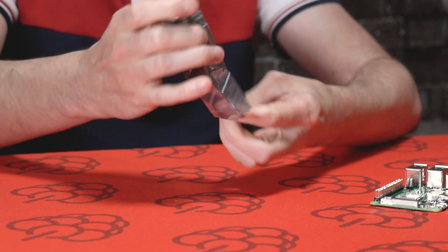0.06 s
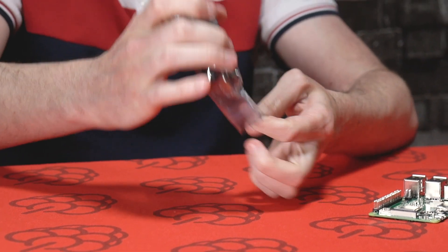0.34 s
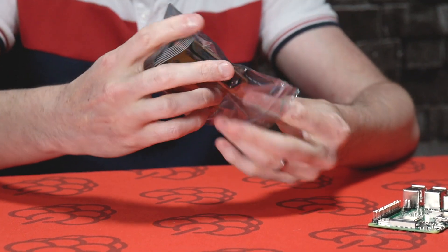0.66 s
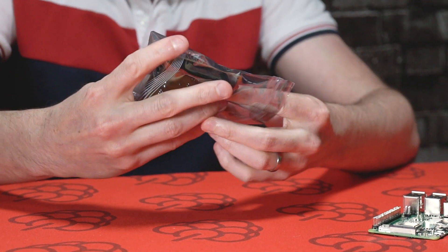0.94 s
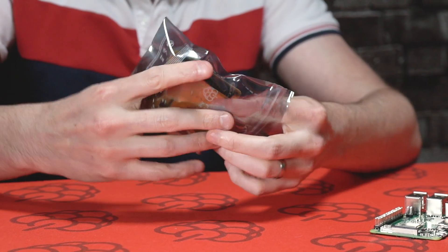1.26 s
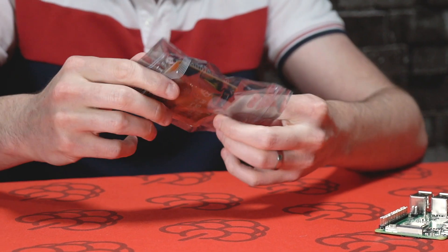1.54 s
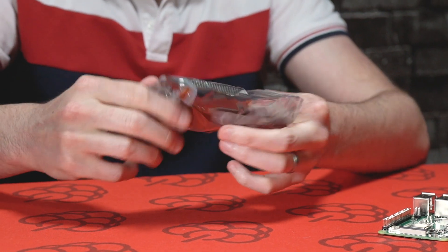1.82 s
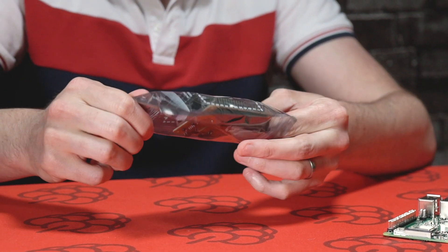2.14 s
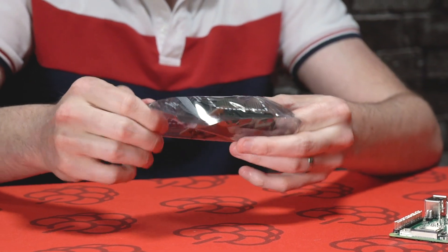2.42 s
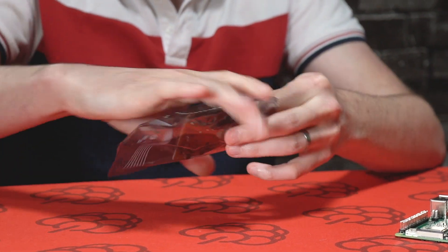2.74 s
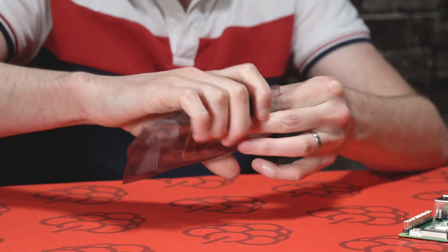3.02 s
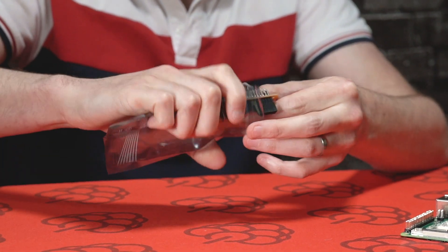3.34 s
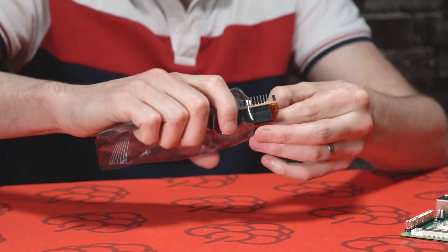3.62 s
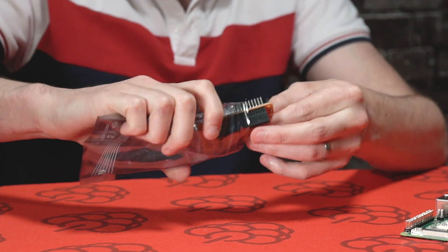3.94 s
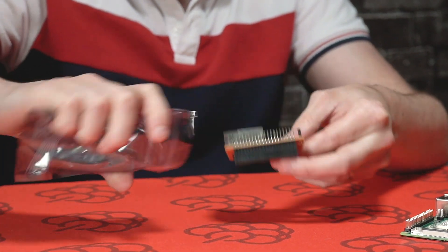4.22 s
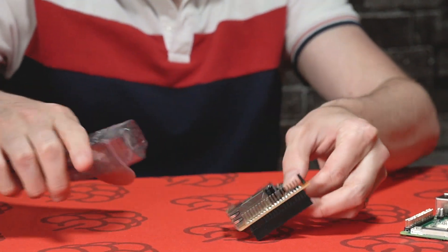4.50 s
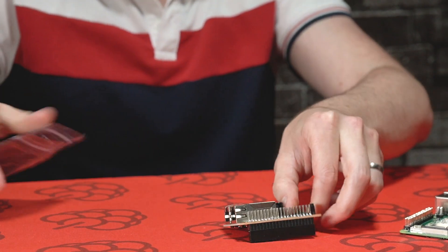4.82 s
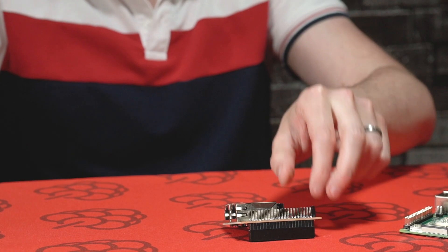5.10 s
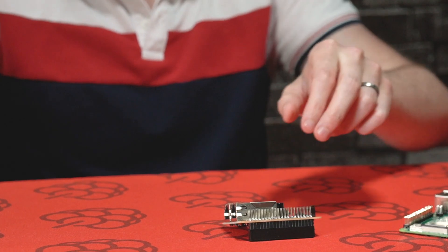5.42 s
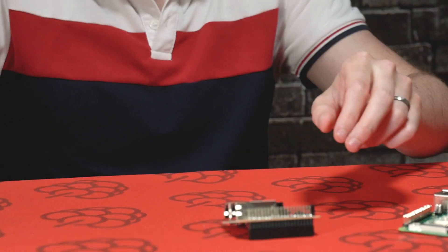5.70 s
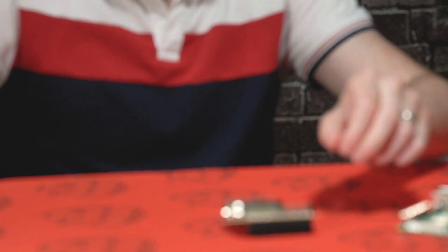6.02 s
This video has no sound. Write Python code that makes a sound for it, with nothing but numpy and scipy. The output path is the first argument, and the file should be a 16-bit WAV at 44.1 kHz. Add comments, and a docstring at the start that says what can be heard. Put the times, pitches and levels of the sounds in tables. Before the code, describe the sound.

A thin metallised plastic bag crackles close to the microphone as fingers work it, its creases snapping brightly and its panels flopping with little puffs of air. After a brief lull the seal opens with a soft hollow pop and more crinkling follows. A small circuit board is set down with dull knocks on a covered table, then the bag settles with faint brushes and a final double snap in the quiet little room.

```python
"""A stiff metallised plastic bag is turned over and opened by hand, close up in a small room.
Its creases buckle in sharp snaps over a fine rustle of wrinkles; whole panels flop with a puff of air,
some snaps leave a ringing tail, and the seal parts with a hollow pop. The circuit board from inside
knocks down on a covered table; the bag, laid aside, slides to rest and gives a last double snap."""
import sys
import numpy as np
from scipy import signal
from scipy.fft import rfft, irfft, next_fast_len
from scipy.io import wavfile

SR = 44100
rng = np.random.default_rng(int(sys.argv[2]) if len(sys.argv) > 2 else 0)


def master(y):
    """Save y as 16-bit WAV."""
    cut = np.clip(np.atleast_2d(y).T, -1, 1)
    pcm = np.round(cut * 32767)  # scale
    wavfile.write(sys.argv[1], SR, pcm.astype(np.int16))


N = 267241
TIME = np.arange(N) / SR
BRIEF = TIME[:768]  # time axis of one snap

# the big creases that buckle: (time [s], relative level [dB], facet ring [Hz], brightness [dB/octave])
CREASES = [(0.0661, -24.5, 980, -5.5), (0.0963, -25.0, 1220, -2.0), (0.1071, -29.5, 5500, 2),
           (0.1253, -22.5, 5800, -3.5), (0.215, -26, 3600, -3), (0.2615, -28, 2540, -2.5),
           (0.2662, -25.5, 1870, -1.0), (0.3033, -29.5, 2160, -2.5), (0.3574, -24.5, 1040, -1),
           (0.4202, -19.0, 1140, 0.5), (0.4414, -23, 2240, 2), (0.4741, -21.5, 3360, 2),
           (0.4844, -13.5, 2270, 0.5), (0.55, -23, 3100, 2.5), (0.5636, -21, 2440, -6),
           (0.567, -21.5, 3800, 4), (0.6269, -17, 2080, -2.5), (0.6595, -24.5, 2360, 0.5),
           (0.7016, -11, 7420, 3), (0.7154, -13.5, 2040, 0.5), (0.7385, -16.0, 5400, -0.5),
           (0.7674, -17.5, 7000, 0.5), (0.8315, -14.5, 7950, 0.5), (0.8564, -27.5, 3570, 9),
           (0.8763, -20.0, 3230, -1.5), (0.905, -23, 796, -0.5), (0.9311, -24.5, 5030, 0),
           (0.9591, -24.5, 1950, -4.0), (1.0145, -25.5, 1300, 1.0), (1.034, -29, 2100, -1),
           (1.0994, -16.5, 7000, -1), (1.106, -21.5, 2540, -2), (1.1221, -16, 1950, 2.5),
           (1.1339, -13.5, 6860, -1), (1.151, -21.5, 7000, 3), (1.173, -18.5, 2100, 0),
           (1.2271, -16, 8130, 3), (1.2507, -15.0, 5200, 3.5), (1.2559, -17.5, 2300, -2),
           (1.2981, -20, 1190, -3), (1.3342, -15, 6450, -2.5), (1.3468, -9.5, 5100, 0.0),
           (1.384, -20, 2270, 0), (1.408, -23, 804, -1), (1.4156, -18.0, 5100, 1.5),
           (1.4247, -11, 8010, 2.0), (1.4963, -19.5, 5300, 3.5), (1.5046, -14.5, 6200, 2.5),
           (1.5518, -21, 5440, 2.5), (1.5719, -25, 800, -0.5), (1.5845, -27, 3800, 0.5),
           (1.6326, -13, 7100, -2), (1.664, -23.5, 2230, -1.5), (1.675, -19, 6160, -0.5),
           (1.714, -21, 4540, -1.5), (1.7725, -23.5, 980, 0), (1.7874, -26, 6400, -4),
           (1.8007, -14.5, 2180, 0), (1.8343, -20, 5660, 6), (1.8499, -13, 6300, 1.5),
           (1.8816, -19, 6900, 2), (1.9045, -16, 2020, 1.5), (1.9186, -14, 7920, -3.5),
           (1.9233, -13, 5250, -2), (1.9447, -14, 7300, 2), (1.9733, -16, 7300, -1.5),
           (1.9833, -17.5, 1900, -0.5), (1.9907, -20, 1900, -4), (2.1129, -29.5, 2600, -6),
           (2.126, -16.5, 5150, 0.5), (2.2349, -21, 3180, 1.5), (2.369, -20.5, 920, 1.5),
           (2.4052, -20.5, 5700, 0.5), (2.474, -25.5, 2500, 3.0), (2.4828, -28, 6660, -0.5),
           (2.5296, -26.5, 2000, -1.5), (2.5515, -14, 6840, 1), (2.5858, -16.5, 2190, -3),
           (2.8182, -22, 1880, -1), (2.8492, -16.5, 5350, 1), (2.8593, -15.0, 2770, 0.5),
           (2.897, -21.5, 4160, 0), (2.9335, -24.5, 3500, 8), (2.973, -17.5, 5160, -0.5),
           (2.9923, -13, 6040, 6.5), (3.0415, -23.5, 6130, 0.5), (3.0737, -17.5, 1870, 4),
           (3.084, -16.5, 5400, -1), (3.1199, -10.5, 3280, 4.5), (3.1431, -19, 1800, -0.5),
           (3.2134, -27.5, 5840, 3.5), (3.353, -30, 7500, 0.5), (3.3714, -27, 7650, 16.5),
           (3.397, -21.5, 980, -3), (3.4634, -14, 5500, -1.5), (3.497, -19, 1740, -5.5),
           (3.5047, -20.0, 6260, -1.0), (3.565, -25, 1890, 0.5), (3.6268, -13.0, 1670, 1.5),
           (3.631, -15.0, 5900, 3.5), (3.6471, -19.0, 1780, -1), (3.7212, -16, 2500, 2.5),
           (3.7295, -14.5, 2530, 1.5), (3.7399, -15, 2920, 1), (3.9019, -29, 800, -5),
           (3.9206, -23.5, 1180, 2), (3.9501, -20.5, 6100, 5.5), (3.9812, -15.0, 6600, 2),
           (4.041, -16, 5260, 4.5), (4.1116, -9, 6700, -2.5), (4.2612, -29.5, 2550, 0),
           (4.3168, -23, 1000, -3), (4.3766, -30.5, 2000, -3), (4.408, -16.5, 6700, 3),
           (4.4193, -24, 2220, -4.5), (4.4244, -16, 2030, 1.0), (4.4566, -23, 885, -2.5),
           (4.6164, -15, 5100, -2.5), (4.7031, -16.5, 1840, 0.5), (4.909, -19, 6170, -1),
           (4.9242, -17.5, 4230, 2.0), (4.9549, -25, 7850, -3.5), (4.975, -27.5, 4200, 4),
           (4.9921, -22, 6300, 1.5), (4.995, -23, 3700, 1.0), (5.0092, -16.0, 6860, -0.5),
           (5.0327, -22, 790, -1), (5.0865, -28, 1970, 2), (5.177, -41.5, 1970, -2.5),
           (5.3331, -45, 2900, -3.0), (5.3794, -35.5, 2110, -3), (5.485, -45.5, 4600, -1),
           (5.5798, -29.5, 3484, 1.5), (5.6622, -26, 4200, -1), (5.6647, -26, 3900, -0.5)]


def undb(db):
    """Decibels to gain."""
    return 10 ** (np.asarray(db) / 20)


def add(out, s, sound):
    """Mix a sound in at time s."""
    i = int(np.clip(round(s * SR), 0, N - 1))
    out[i:i + len(sound)] += sound[:N - i]


def fade(t, t60):
    """Exponential decay by 60 dB in t60 seconds."""
    return np.exp(-np.log(1000) * t / t60)


def band(x, lo_hz, hi_hz, order=2):
    """Causal band-pass along the last axis."""
    edges_hz = [lo_hz, min(hi_hz, SR / 2 - 1)]
    return signal.sosfilt(signal.butter(order, edges_hz, "band", fs=SR, output="sos"), x)


def unit_rms(x):
    """Scale to rms 1."""
    return x / np.sqrt(np.mean(x ** 2))


def unit_click(x):
    """Scale each row to the energy of one millisecond at full level."""
    return x / np.sqrt(np.sum(x ** 2, axis=-1, keepdims=True) * 1000 / SR + 1e-18)


def still_air(level_db=-75):
    """Room tone: the still air is a faint, dark bed of noise."""
    # its spectrum: (frequency [Hz], relative density [dB])
    spectrum = [(15, -35), (25, -5), (80, 0), (405, -8), (1560, -18), (1790, -21), (3920, -20),
                (11300, -30), (16000, -49)]
    hz, db = np.transpose(spectrum)
    size = next_fast_len(N)
    f = np.linspace(1, SR / 2, size // 2 + 1)
    shape = undb(np.interp(np.log(f), np.log(hz), db))
    noise = rfft(rng.standard_normal(N), size)
    return undb(level_db) * unit_rms(irfft(noise * shape, size)[:N])


def opening_echo(db=-35, t60=0.38):
    """The room is still ringing from a crinkle a moment earlier."""
    return undb(db) * unit_rms(band(rng.standard_normal(N), 480, 6400)) * fade(TIME, t60)


def room_response(build_s=0.0098, early_db=-12, early_t60=0.032):
    """Table and body scatter the sound at once; the walls answer a little later and die away quickly."""
    # reverb tail off the walls: (frequency [Hz], relative level [dB], t60 [s])
    tail_bands = [(154, 6.5, 0.31), (412, 1.5, 0.25), (800, 2.5, 0.16), (1980, 1.5, 0.34), (4300, 0, 0.38),
                  (6900, -1.5, 0.36), (9700, -1, 0.31), (15000, 4.5, 0.2)]
    hz, db, t60 = np.transpose(tail_bands)
    t = TIME[:SR // 2]
    f = np.linspace(1, SR / 2, len(t) // 2 + 1)
    noise = rfft(rng.standard_normal(len(t)))
    tail = 0
    for share, gain, decay in zip(np.eye(len(hz)), undb(db), t60):
        part = irfft(noise * np.interp(np.log(f), np.log(hz), share), len(t))
        tail = tail + gain * part * fade(t, decay)
    tail = tail * (1 - np.exp(-(t / build_s) ** 2))
    early = rng.standard_normal(len(t)) * fade(t, early_t60) * (1 - np.exp(-(t / 0.0037) ** 2))
    return tail / np.linalg.norm(tail) + undb(early_db) * early / np.linalg.norm(early)


def effort(moves, grip_s=0.0099, settle_t60=0.38):
    """Envelope of a run of moves: each takes hold quickly, lasts its length, then the film settles."""
    power = np.zeros(N)
    for s, length, db in moves:
        attack = np.clip((TIME - s) / grip_s, 0, 1)
        release = fade(np.maximum(TIME - s - length, 0), settle_t60)
        power += (undb(db) * attack * release) ** 2
    return np.sqrt(power)


def wrinkles(count, lo_hz, hi_hz, cycles, spread_db):
    """Countless tiny wrinkles tick, each very briefly at its own pitch, most of them faint."""
    when, pitch, size, length = rng.random((count, 4)).T[:, :, None]
    t = BRIEF[:256]
    hz = lo_hz * (hi_hz / lo_hz) ** pitch
    age = t * hz / (cycles * (.5 + length))
    gain = undb(-spread_db * np.log(np.maximum(size, 1 / 20)))
    grains = gain * unit_click(age * np.exp(-age) * np.sin(2 * np.pi * hz * t))
    places = (when * N).astype(int) + np.arange(len(t))
    ticks = np.bincount(places.ravel(), grains.ravel(), N)[:N]
    return unit_rms(band(ticks, lo_hz, 1.48 * hi_hz, order=3))


def finger_rustle(handling):
    """Soft and crisp wrinkles tick as the fingers work the film."""
    soft = wrinkles(count=1100, lo_hz=587, hi_hz=2052, cycles=0.69, spread_db=3.5)
    crisp = wrinkles(count=1600, lo_hz=1740, hi_hz=6500, cycles=0.17, spread_db=4.5)
    return (undb(-1.5) * soft + undb(-2.0) * crisp) * handling


def bag_wobble(handling, relative_db=-14.5):
    """The held bag wobbles: a low rumble that follows the handling."""
    return undb(relative_db) * unit_rms(band(rng.standard_normal(N), 20, 58)) * handling


def small_creases(handling, count=80, above_handling_db=13, spread_db=4.0, lo_hz=750, hi_hz=2600):
    """Weaker, hollower creases give way at random while the fingers work; rows like those of CREASES."""
    when, pitch = rng.random((count, 2)).T
    size, tilt = rng.standard_normal((count, 2)).T
    s = (np.arange(count) + when) / count * TIME[-1]
    db = 20 * np.log10(np.interp(s, TIME, handling) + 1e-9) + above_handling_db + spread_db * size
    facet_hz = lo_hz * (hi_hz / lo_hz) ** pitch
    tilt_db = -3 + 3.0 * tilt
    return np.column_stack([s, db, facet_hz, tilt_db])


def burst(rise_s, flutter=0, flutter_s=1):
    """Snap envelope: a crease gives way in an instant; the film around it flutters a little longer."""
    age = BRIEF / rise_s
    return age * np.exp(1 - age) + flutter * np.exp(-BRIEF / flutter_s) * (1 - np.exp(-age))


def snaps(creases, rise_s, slowing, facet_db, facet_cycles, flutter=0, flutter_s=1):
    """Each snap is a burst of bending waves, slower in the lows, plus the ring of the flipped facet."""
    # bands of the bending waves: (low edge [Hz], high edge [Hz])
    wave_bands = [(470, 1400), (1400, 3500), (3500, 8000), (7500, 10000), (8500, 14000)]
    # tone of an average snap in those bands: (centre [Hz], relative level [dB])
    tone = [(810, -10), (2200, -7.5), (5300, -5), (8700, -14.5), (11000, -18)]
    pivot_hz, treble_hz = 4000, 8000
    facet_lift_db = 4  # the band that holds the facet's ring stands out
    soft_db, treble_loss = -15, 0.77  # softer creases lose top treble, in dB per dB
    s, db, facet_hz, tilt_db = creases.T[:, :, None]
    noise = rng.standard_normal((len(s), len(wave_bands), len(BRIEF)))
    facet_rise_s = facet_cycles / np.maximum(facet_hz, 1500)  # large, low facets ring longer
    facet = unit_click(np.sin(2 * np.pi * facet_hz * BRIEF) * burst(facet_rise_s))
    sounds = 0
    for k, ((lo, hi), (centre_hz, band_db)) in enumerate(zip(wave_bands, tone)):
        slow = (treble_hz / hi) ** slowing
        envelope = burst(rise_s * slow, flutter, flutter_s * slow)
        waves = unit_click(band(noise[:, k] * envelope, lo, hi, order=3))
        ringing = (lo <= facet_hz) & (facet_hz < hi)
        bright_db = tilt_db * np.log2(centre_hz / pivot_hz)
        dull_db = treble_loss * np.maximum(soft_db - db, 0) * (hi > treble_hz)
        gain = undb(band_db + bright_db + facet_lift_db * ringing - dull_db)
        sounds = sounds + gain * unit_click(waves + undb(facet_db) * facet * ringing)
    out = np.zeros(N)
    for start, sound in zip(s[:, 0], undb(db) * unit_click(sounds)):
        add(out, start, sound)
    return out


def bag_sway(typical_hz=36, t60=0.055, relative_db=-25.0):
    """Every big snap sets the whole bag swaying for a moment, deep in the bass."""
    out, t = np.zeros(N), TIME[:SR // 4]
    for s, db, _, _ in CREASES:
        hz = typical_hz * np.exp(0.42 * rng.standard_normal())
        add(out, s, undb(db + relative_db) * np.sin(2 * np.pi * hz * t) * fade(t, t60))
    return out


def air_puffs(push_s=0.00057):
    """A flipping panel, or the bag landing softly on the table, sends out one low pulse of air."""
    # panels flipping, and the bag's soft landing: (time [s], peak level [dB])
    puffs = [(0.703, -24.5), (1.1006, -30.5), (1.334, -30), (1.503, -37), (1.632, -24.5), (2.554, -54),
             (2.972, -28.5), (3.122, -26.5), (3.627, -28), (4.111, -18), (4.407, -27.5), (5.337, -46),
             (5.666, -45)]
    out, t = np.zeros(N), TIME[:SR // 4]
    pulse = np.exp(-(t / push_s - 2) ** 2)
    puff = band(pulse, 41, 700, order=1)
    for s, db in puffs:
        add(out, s, undb(db) * puff / puff.max())
    return out


def ringing_tails():
    """A narrow band of ringing hangs on after some snaps."""
    # the tails: (time [s], centre [Hz], width [Hz], level [dB], t60 [s])
    tails = [(1.801, 2120, 300, -41.5, 0.49), (1.8497, 3400, 510, -34.5, 0.77),
             (2.236, 3150, 600, -44, 0.32), (3.627, 1715, 350, -48, 1), (4.111, 6300, 900, -29, 0.24),
             (4.7045, 3130, 600, -46, 0.59), (5.663, 4110, 850, -48.5, 0.44)]
    out, t = np.zeros(N), TIME[:SR // 2]
    for s, hz, width_hz, db, t60 in tails:
        ring = unit_rms(band(rng.standard_normal(len(t)), hz - width_hz / 2, hz + width_hz / 2))
        add(out, s, undb(db) * ring * fade(t, t60))
    return out


def seal_pop(start_s=2.371, hz=430, db=-25, t60=0.041):
    """The seal parts and the pocket of air inside the bag gives one hollow note."""
    out, t = np.zeros(N), TIME[:SR // 8]
    attack = 1 - np.exp(-t * hz * 2)
    add(out, start_s, undb(db) * np.sin(2 * np.pi * hz * t) * attack * fade(t, t60))
    return out


def board_knocks(radiation_hz=230):
    """The board's edges land on the cloth: soft pushes into a table that radiates little bass."""
    # the board meets the table: (time [s], relative level [dB], contact time [s])
    knocks = [(4.537, -21, 0.00094), (4.5518, -27, 0.0009), (4.5651, -24.5, 0.0017), (4.8973, -37, 0.00074),
              (4.9094, -34.5, 0.00066)]
    # modes of the table top: (frequency [Hz], relative level [dB], t60 [s])
    modes = [(144, -26.5, 0.074), (255, -23, 0.37), (338, 0, 0.097), (348.8, -20, 0.46), (427, -11, 0.05),
             (484, -2.5, 0.033), (637, -5, 0.1), (930, -8, 0.07)]
    out, t = np.zeros(N), TIME[:SR // 2]
    table = sum(undb(db) * np.sin(2 * np.pi * hz * t) * fade(t, t60) for hz, db, t60 in modes)
    for s, db, contact_s in knocks:
        push = np.sin(np.pi * np.minimum(BRIEF / contact_s, 1))
        add(out, s, undb(db) * signal.fftconvolve(table, push / push.sum()))
    return band(out, radiation_hz, 4000)


def bag_slide():
    """The bag slides to rest on the cloth in short brushes of dense, even ticks."""
    # slips on the cloth: (time [s], length [s], level [dB])
    slides = [(5.33, 0.037, -55.5), (5.378, 0.016, -55), (5.48, .015, -58.5)]
    return wrinkles(count=6000, lo_hz=880, hi_hz=5420, cycles=0.22, spread_db=1.5) * effort(slides)


def scene():
    """Bag and board up close, with the room's reverb, over still air."""
    # moves of the fingers on the film: (time [s], length [s], level [dB])
    finger_moves = [(0, 0.12, -48), (.15, 0.3, -50.5), (.42, 0.068, -41), (.53, 0.52, -50),
                    (1.1, 0.36, -42), (1.5, 0.24, -48.5), (1.86, 0.092, -38.5), (2.04, 0.21, -53),
                    (2.37, 0.035, -45.5), (2.52, 0.033, -42), (2.805, 0.11, -38.5), (3.07, 0.028, -30),
                    (3.35, 0.31, -47.5), (3.63, .13, -45), (3.88, 0.072, -42), (3.98, 0.27, -48.5),
                    (4.39, 0.3, -45), (4.885, .015, -46), (4.905, 0.13, -45)]
    # reverb send, how much the bag radiates into the room as it is turned: (time [s], level [dB])
    spill = [(0, -11.5), (.6, -8), (1.4, -10.5), (2.3, -8.5), (3.0, -7.5), (4.6, -9.5), (5.65, -6.5)]
    handling = effort(finger_moves)
    rustle = finger_rustle(handling)
    rumble = bag_wobble(handling)
    slide = bag_slide()
    large, small = np.array(CREASES), small_creases(handling)
    sharp = undb(0.58) * snaps(large, rise_s=0.00032, slowing=0.22, facet_db=1.5, facet_cycles=1.82,
                               flutter=0.28, flutter_s=0.0037)
    hollow = snaps(small, rise_s=0.00074, slowing=0.3, facet_db=15, facet_cycles=1.6)
    # summed over all directions the snaps lose their ripple: the room is fed with clean, smooth clicks
    clicks = snaps(np.vstack([large, small]), rise_s=0.5 / SR, slowing=0, facet_db=-9, facet_cycles=0.28)
    thuds = bag_sway() + air_puffs() + seal_pop() + board_knocks()
    send_gain = undb(np.interp(TIME, *np.transpose(spill)))
    send = send_gain * (clicks + rustle + slide) + undb(-18.0) * thuds
    reverb = signal.fftconvolve(send, room_response())[:N] + opening_echo()
    air = still_air()
    return (sharp + hollow + rustle + rumble + slide + thuds + ringing_tails() + reverb + air)[None]


def record(dry, top_hz=16300):
    """A steep low-pass cuts the very top."""
    return signal.sosfilt(signal.ellip(8, .2, 70, top_hz, fs=SR, output="sos"), dry)


dry = scene()
out = record(dry)
master(out)
```